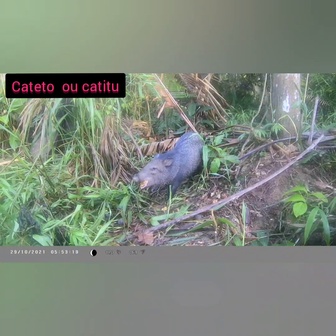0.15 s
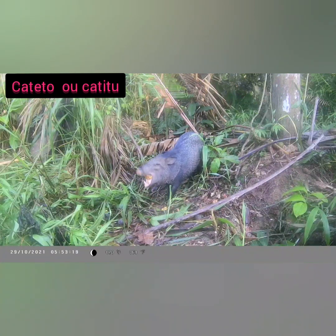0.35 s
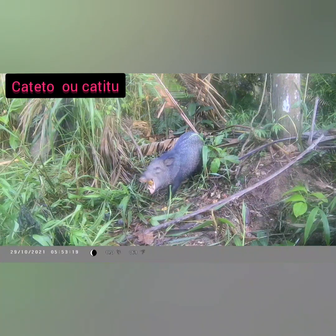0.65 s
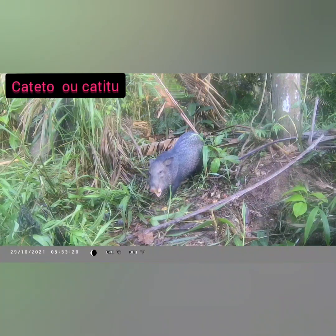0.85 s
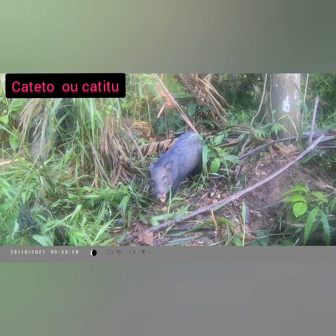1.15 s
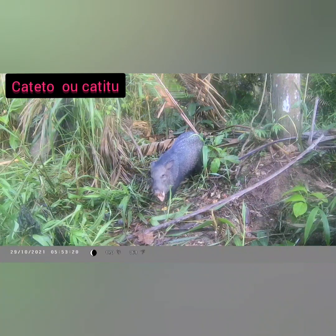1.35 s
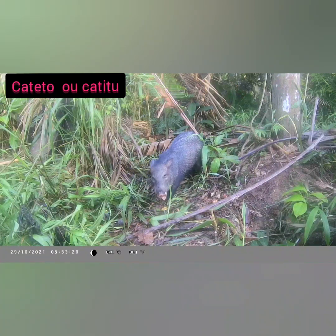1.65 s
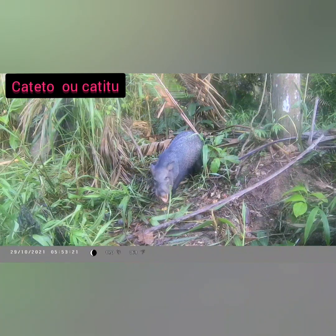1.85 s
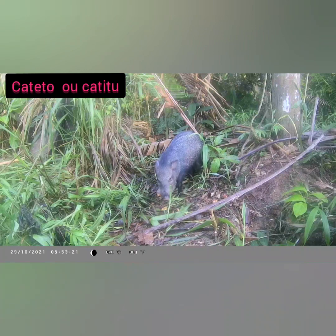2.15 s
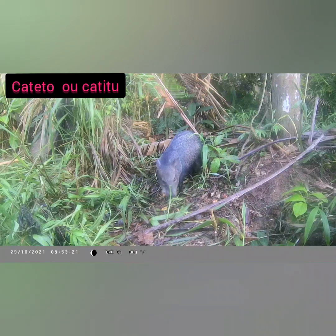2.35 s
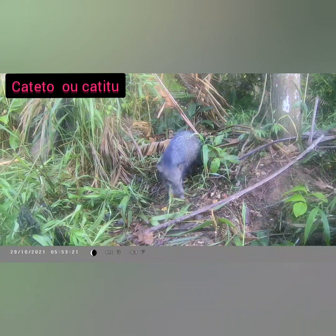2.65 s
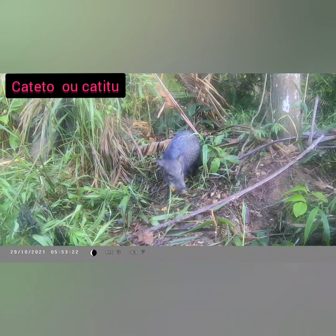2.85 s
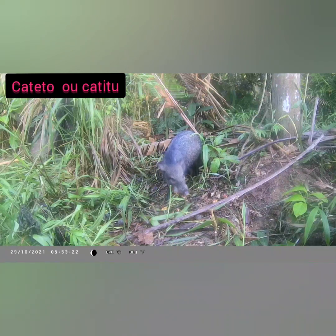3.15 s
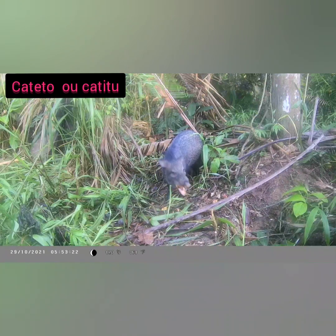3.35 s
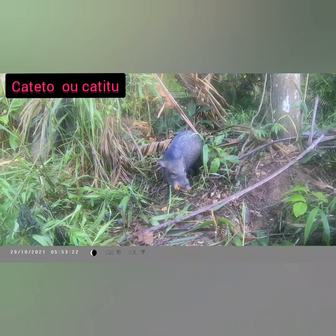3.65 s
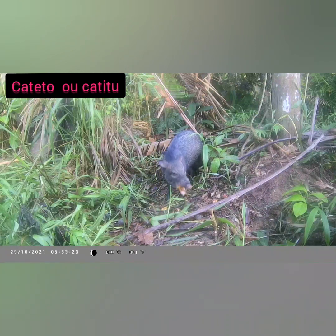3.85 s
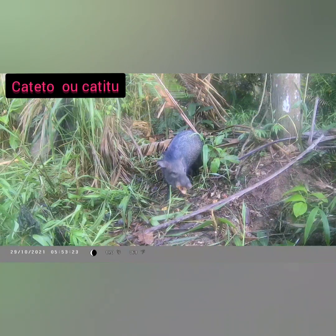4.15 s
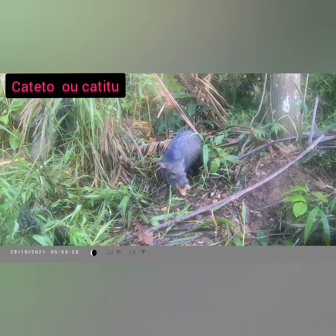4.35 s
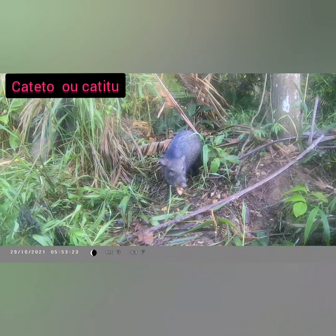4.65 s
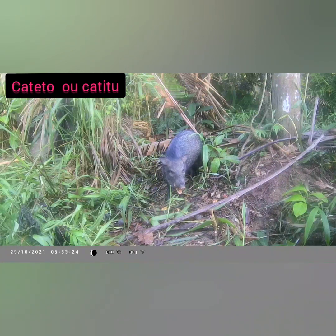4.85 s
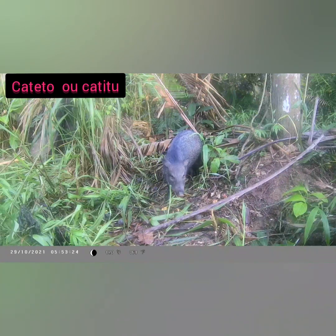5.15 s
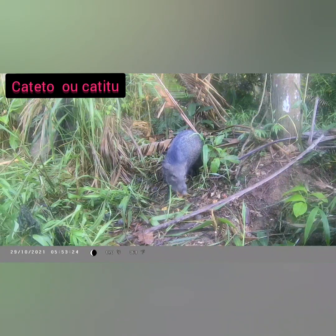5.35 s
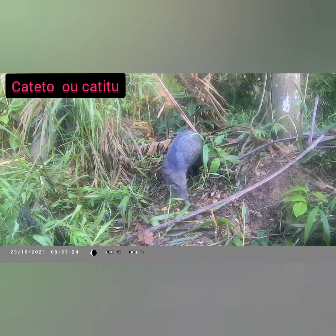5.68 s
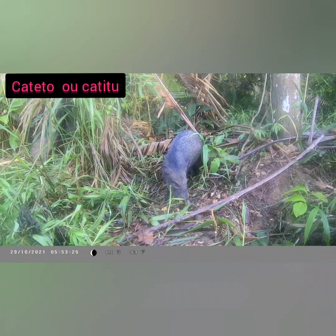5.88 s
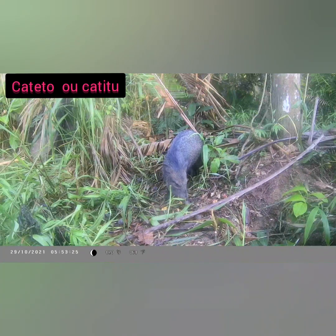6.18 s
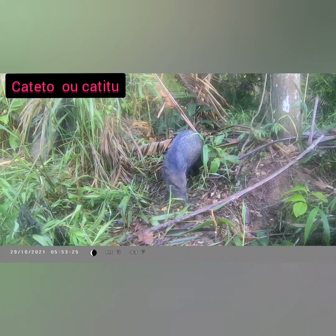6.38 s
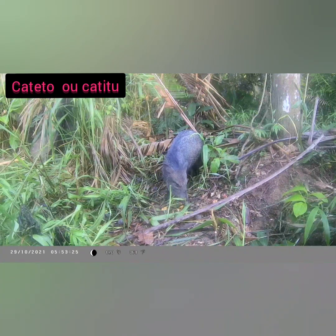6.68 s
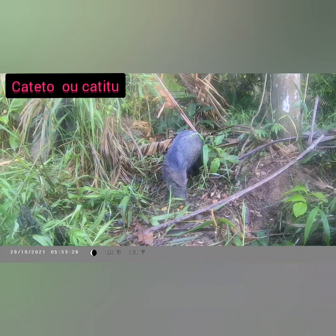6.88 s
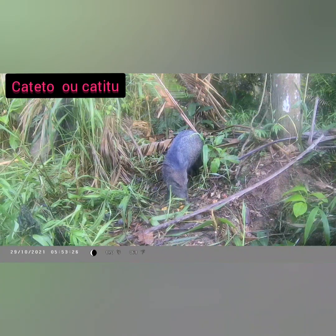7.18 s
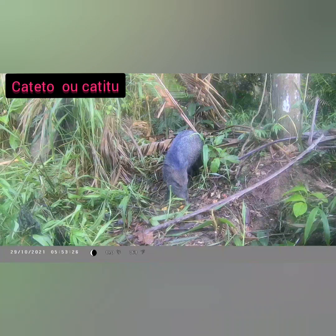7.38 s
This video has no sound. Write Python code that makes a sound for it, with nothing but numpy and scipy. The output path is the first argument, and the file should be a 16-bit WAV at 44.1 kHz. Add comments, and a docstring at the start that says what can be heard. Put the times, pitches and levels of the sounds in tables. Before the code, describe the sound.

A steady chorus of insects, perhaps tiny frogs, chirps throughout in a leafy forest. Rough rising notes come mostly in quick pairs, echoing among trunks, over a shimmering band and soft hiss. Crickets trill in bouts, birds whistle faintly far off, and a peccary makes small irregular cracks and leaf ticks. A fixed outdoor microphone adds low flutter and a faint tone, with dull top end.

```python
"""A chorus of insects (perhaps tiny frogs too) throws rising chirps, mostly in pairs, in a tropical forest.
Each chirp is a pulsed sine that climbs in pitch; noise-like echo tails scatter the calls among the trunks.
Crickets trill in short sine strokes, birds whistle far off, and a peccary cracks food and stirs the litter
with bursts of ringing noise. Shaped noise makes the steady hiss; the trail camera adds a low flutter
and a faint tone of its own from multiples of its frame rate."""
import sys
import numpy as np
from scipy import signal
from scipy.fft import rfft, irfft
from scipy.io import wavfile
from scipy.ndimage import uniform_filter1d

SR = 44100
rng = np.random.default_rng(int(sys.argv[2]) if len(sys.argv) > 2 else 0)


def persist_wave(psi):
    """Save psi, clipped to +-1, as 16-bit WAV."""
    counts = np.round(np.clip(psi, -1, 1) * 32767).astype(np.int16)
    wavfile.write(sys.argv[1], SR, np.atleast_2d(counts).T)


N = 331632  # length in samples, about 7.5 s
TIME = np.arange(N) / SR


def undb(db):
    """Turn decibels into a gain."""
    return 10 ** (np.asarray(db) / 20)


def unit(x):
    """Scale a sound to an average (rms) strength of 1."""
    return x / np.sqrt(np.mean(x ** 2) + 1e-30)


def curve(rows):
    """Join (time in seconds, value) rows by straight lines."""
    return np.interp(TIME, *np.transpose(rows))


def add(out, start, sound):
    """Mix a sound in at a given time, dropping whatever falls outside the scene."""
    i = int(start * SR)
    part = sound[max(-i, 0):max(N - i, 0)]
    first = max(i, 0)
    out[first:first + len(part)] += part


def sine(hz):
    """A tone of rms 1 that follows a pitch curve, from a random point in its cycle."""
    cycles = np.cumsum(hz) / SR + rng.random()
    return np.sqrt(2) * np.sin(2 * np.pi * cycles)


def walk(rate):
    """Smooth random wandering with a spread near 1, taking "rate" new values a second."""
    size = int(SR / rate)
    steps = np.repeat(rng.standard_normal(N // size + 1), size)
    smooth = uniform_filter1d(uniform_filter1d(steps, size), size)
    return unit(smooth)[:N]


def noise(colour):
    """Noise of rms 1 whose spectrum follows (Hz, dB) points."""
    hz, db = np.transpose(colour)
    bins = np.maximum(np.fft.rfftfreq(N, 1 / SR), 1)
    gain = undb(np.interp(np.log(bins), np.log(hz), db))
    return unit(irfft(rfft(rng.standard_normal(N)) * gain, N))


def resonate(x, hz, q):
    """One resonance with gain 1 at its centre; a higher q rings longer and purer."""
    b, a = signal.iirpeak(min(hz, SR / 2 - 1), max(q, 1), fs=SR)
    return signal.lfilter(b, a, x)


def scatter(x, t60, gap=0.0018):
    """Echoes from leaves and trunks: a dense tail of unit energy that fades by 60 dB in t60 seconds."""
    t = np.arange(SR) / SR
    fade = np.exp(-np.log(1000) * t / t60)
    tail = rng.standard_normal(SR) * fade * np.clip(t / gap - 1, 0, 1)  # silent for the first gap seconds
    return signal.fftconvolve(x, tail / np.linalg.norm(tail))[:N]


def chirp(hz, swell, jitter, fade_share=0.53, longest_fade_s=.022, overshoot_hz=200, start_db=-7.5):
    """One rough pulsed note: it starts abruptly, swells while its pitch climbs, then fades."""
    pulse_hz, pulse_depth, attack_s = 88, .62, .002
    rest_hz, climb_s = 3978, .066  # it climbs as if it left the resting pitch this long before its peak
    fade = min(fade_share * swell, longest_fade_s)
    t = np.arange(-swell, 3 * fade, 1 / SR)  # time 0 is the loudest moment
    before, after = np.minimum(t, 0), np.maximum(t, 0)
    pitch = hz + (hz - rest_hz) * before / climb_s + overshoot_hz * np.tanh(after / longest_fade_s)
    attack = np.minimum((t + swell) / attack_s, 1)
    shape = attack * undb(-start_db * before / swell) * np.exp(-(after / fade) ** 1.8)
    # each note pulses at its own slightly different rate
    half_turns = pulse_hz * rng.uniform(.85, 1.15) * t + rng.uniform(-.25, .25)
    pulses = 1 - pulse_depth * np.sin(np.pi * half_turns) ** 4
    return sine(pitch + jitter[:len(t)]) * shape * pulses


def chirps(gain_db=.6, direct_slope=0.29, forest_db=-5, trunk_db=-10, trunk_s=.034):
    """A call is one note, or that note and a shorter repeat; weaker callers are further off and wetter."""
    # Rising chirps, single or in pairs. Each row: loudest moment of the first note in seconds,
    # level in dB before the shared gain, pitch when loudest in Hz, number of notes.
    calls = [(-.064, -39, 4853, 2), (0.104, -55.5, 4280, 1), (.222, -39.5, 4836, 1), (.715, -49, 4400, 1),
             (0.741, -38.5, 4775, 2), (1.013, -45.5, 4790, 1), (1.165, -42, 4790, 2), (1.205, -40, 4805, 2),
             (1.512, -48.5, 4790, 1), (1.58, -51, 4390, 1), (1.72, -36, 4845, 2), (2.08, -56.5, 4300, 1),
             (2.142, -47.5, 4780, 1), (2.355, -38, 4852, 2), (2.695, -46, 4810, 1), (2.866, -40.5, 4856, 2),
             (3.175, -38, 4845, 2), (3.426, -46.5, 4640, 1), (3.524, -47, 4840, 1), (3.72, -40, 4730, 2),
             (4.123, -40, 4814, 2), (4.352, -38.5, 4710, 2), (4.765, -46.5, 4720, 1),
             (4.917, -41.5, 4830, 2), (4.94, -48, 4400, 1), (4.984, -40, 4700, 1), (5.365, -53.5, 4350, 1),
             (5.433, -38, 4833, 2), (5.692, -41.5, 4860, 2), (5.849, -53.5, 4390, 1), (5.932, -38, 4877, 2),
             (6.29, -46.5, 4570, 1), (6.531, -41, 4834, 2), (6.713, -38.5, 4814, 2),
             (7.051, -48.5, 4570, 1), (7.114, -40, 4853, 2), (7.447, -38.5, 4866, 1)]
    near_db = -39  # chirps this loud arrive directly
    swell_s, smear_s_per_db = 0.035, .0017  # weaker, farther chirps swell more slowly
    pair_gap_s, second_swell_s, second_note_db = .105, .019, 0.54
    jitter_hz = 50
    near, far, jitter = np.zeros(N), np.zeros(N), jitter_hz * walk(500)
    for first_peak, db, hz, notes in calls:
        weaker_db = max(near_db - db, 0)
        direct = undb(-direct_slope * weaker_db)
        scattered = np.sqrt(max(1 - direct ** 2, 0))
        first = (first_peak, swell_s + smear_s_per_db * weaker_db, db)
        second = (first_peak + pair_gap_s, second_swell_s, db + second_note_db)
        for peak, swell, note_db in [first, second][:round(notes)]:
            note = chirp(hz, swell, np.roll(jitter, -int(peak * SR))) * undb(note_db + gain_db)
            add(near, peak - swell, note * direct)
            add(far, peak - swell - .008, note * scattered)
    leaves = undb(-7) * scatter(near, t60=.06) + scatter(far, t60=.07)
    trunk = np.zeros(N)
    add(trunk, trunk_s, undb(trunk_db) * scatter(near, t60=.04))  # one stronger echo from a big tree
    return near + leaves + trunk + undb(forest_db) * scatter(near + far, t60=0.62)


def slurs(length=.065, first_hz=4130, fall_hz=190, overtone_db=-26):
    """A lower caller repeats a note that sags at its end, with a faint octave above it."""
    # Runs of soft falling notes. Each row: start in seconds, level in dB, number of notes.
    runs = [(.729, -59, 4), (2.239, -59, 5), (3.839, -58.5, 4), (4.9, -60, 4), (6.333, -59.5, 4)]
    period = .088  # seconds from note to note
    out, u = np.zeros(N), np.linspace(0, 1, int(length * SR))
    for start, db, notes in runs:
        for k in range(round(notes)):
            hz = first_hz + 15 * rng.standard_normal() - fall_hz * u ** 2
            tone = sine(hz) + undb(overtone_db) * sine(2 * hz)
            add(out, start + k * period, undb(db) * np.sin(np.pi * u) * tone)
    return out + undb(-9) * scatter(out, t60=.3)


def near_cricket(length=.026, sag_hz=90):
    """Each closing of the wings rings one short tone that sags as the stroke slows."""
    # Phrases of strokes. Each row: middle of the first stroke in seconds, number of strokes,
    # first pitch in Hz, last pitch in Hz, first level in dB, last level in dB.
    phrases = [(2.417, 9, 5755, 5900, -51.5, -52.5), (5.234, 1, 5180, 5290, -50.5, -52),
               (5.36, 6, 5190, 5490, -52, -46.5)]
    period = .0448  # seconds from stroke to stroke
    out, u = np.zeros(N), np.linspace(0, 1, int(length * SR))
    for start, count, first_hz, last_hz, first_db, last_db in phrases:
        strokes = np.linspace((first_hz, first_db), (last_hz, last_db), round(count))
        for k, (hz, db) in enumerate(strokes):
            tone = sine(hz - sag_hz * (u - .5))
            add(out, start + k * period - length / 2, undb(db) * np.sin(np.pi * u) * tone)
    return out + undb(-14.0) * scatter(out, t60=0.5)


def far_cricket(pitch_hz=5750, sag_hz=140, wander_hz=45, rasp_db=-4):
    """Bouts of a fast raspy trill whose strokes differ a little in pitch, blurred by the undergrowth."""
    # Bouts of trilling. Each row: start in seconds, end in seconds.
    bout_times = [(.42, 0.88), (1.54, 2.24), (3.72, 4.45), (4.85, 6.72), (7.1, 8.3)]
    trill_db, fade_s = -69.5, .06  # shared gain in dB; time of each fade in or out
    stroke_hz = 33.5
    stroke = np.cumsum(stroke_hz * (1 + 0.017 * walk(4.2))) / SR % 1  # runs from 0 to 1 in each stroke
    pitch = pitch_hz + wander_hz * walk(50) - sag_hz * (stroke - .5)
    song = unit(sine(pitch) * np.sin(np.pi * stroke) ** 2)
    rasp = unit(resonate(resonate(rng.standard_normal(N), 5900, 15), 5900, 15))
    bouts = np.zeros(N)
    for start, end in bout_times:
        bouts += np.clip(.5 + np.minimum(TIME - start, end - TIME) / fade_s, 0, 1)
    mix = undb(2.5) * song + undb(-9) * scatter(song, t60=0.58) + undb(rasp_db) * rasp
    return mix * bouts * undb(trill_db)


def chorus(db=-53.0, spread_db=4, length=0.07, first_hz=4150, last_hz=5100, count=170):
    """Scores of far callers whose rising chirps melt into one shimmering band."""
    # Rise and fall of the chorus; only the shape counts. Each row: time in seconds, level in dB.
    loudness = [(0.0, -50.5), (0.71, -55.5), (0.88, -50), (5.34, -52), (5.55, -50), (7.52, -52)]
    # Colour of its noise part, relative only. Each row: frequency in Hz, level in dB.
    colour = [(3600, -52.5), (3950, -13), (4200, -2.5), (4500, 2), (4850, 4), (5080, 4.5), (5350, -24.5),
              (5900, -37)]
    calls, u = np.zeros(N), np.linspace(0, 1, int(length * SR))
    places = (np.arange(count) + rng.random(count)) / count  # spread over the whole scene
    for place, (size, detune) in zip(places, rng.uniform(-0.967, 1, (count, 2))):
        hz = (first_hz + (last_hz - first_hz) * u) * (1 + 0.0363 * detune)
        call = undb(spread_db * size) * np.sin(np.pi * u) * sine(hz)
        add(calls, place * N / SR - length / 2, call)
    blend = undb(-4) * unit(calls + .6 * scatter(calls, t60=.4)) + undb(-3) * noise(colour)
    return undb(db) * blend * unit(undb(curve(loudness)))


def low_drone(db=-79, hz=3220, q=12):
    """Very distant insects hold a thin band below the chorus."""
    band = unit(resonate(resonate(rng.standard_normal(N), hz, q), hz, q))
    return undb(db + 2 * walk(7)) * band


def birds(clear_db=-12, foliage_db=-4, haze_db=-1.0, rise_swell_db=7):
    """Whistles from deep among the trees; many paths through the foliage blur them into a haze."""
    # Whistles that slur upwards, then downwards. Each row: start in seconds, length in seconds,
    # middle pitch in Hz, level in dB before the mix of clear and blurred sound.
    rising = [(.345, 0.18, 3030, -61.5), (0.823, 0.16, 3130, -59.5), (1.308, .16, 2940, -60),
              (2.706, 0.051, 2570, -68), (2.989, 0.07, 2674, -70.5), (4.976, 0.092, 2950, -67),
              (5.208, 0.098, 2870, -63), (6.859, 0.057, 2455, -67)]
    falling = [(.28, 0.052, 3320, -65), (0.742, .04, 3270, -65.5), (2.203, .05, 3470, -63),
               (0.931, .16, 2880, -67.5), (1.367, 0.16, 2390, -64), (2.811, .2, 2763, -65),
               (3.039, .12, 2894, -64), (3.959, 0.18, 1802, -70), (4.635, 0.21, 1900, -67.5),
               (5.045, 0.077, 3680, -58), (5.037, .22, 2025, -67.5), (5.323, .083, 2590, -68),
               (6.551, 0.075, 2790, -68), (6.917, 0.17, 2443, -66.5)]
    # Long level whistles. Each row: start in seconds, length in seconds, level in dB before that mix.
    held = [(3.585, 0.17, -69.5), (4.38, 0.18, -69), (5.01, 0.14, -68), (5.53, 0.38, -71),
            (6.088, 0.36, -71)]
    rise_oct_per_s, fall_oct_per_s, held_hz = 1.9, 2.2, 2282  # slur speeds are those at mid-note
    glide_ease = .45  # share by which a slur slows towards its end
    waver, blur = .016, .03  # pitch wobble as a share of the pitch
    clear, hazy = np.zeros(N), np.zeros(N)
    voices = ((clear, 1 + waver * walk(70)), (hazy, 1 + blur * walk(300)))
    notes = [(*row, rise_oct_per_s) for row in rising]
    notes += [(*row, -fall_oct_per_s) for row in falling]
    notes += [(start, length, held_hz, db, 0) for start, length, db in held]
    for start, length, middle_hz, db, glide in notes:
        u = np.linspace(-.5, .5, int(length * SR))
        hz = middle_hz * 2 ** (glide * length * (u - glide_ease * u ** 2))
        level = undb(db + rise_swell_db * u * (glide > 0))  # rising notes grow louder
        shape = level * np.sqrt(np.abs(np.cos(np.pi * u)))
        for out, wobble in voices:
            note_wobble = np.roll(wobble, -int(start * SR))[:len(u)]
            add(out, start, shape * sine(hz * note_wobble))
    foliage = undb(foliage_db) * scatter(clear, t60=0.091)
    return undb(clear_db) * clear + foliage + undb(haze_db) * scatter(hazy, t60=.9)


def peccary(body_q=0.34, snap_hz=4500, attack_s=0.00068, crack_db=1):
    """Food and twigs break with a snap and a body that rings purer the longer it lasts; leaves brush past."""
    # Cracks of food and twigs. Each row: start in seconds, level in dB before the shared crack gain,
    # ringing pitch in Hz, decay time in seconds.
    cracks = [(.205, -42, 1060, 0.0019), (0.391, -53, 780, 0.0067), (1.258, -57, 2380, 0.0048),
              (1.726, -60, 1370, 0.0083), (1.93, -58.5, 2020, 0.01), (2.011, -55, 805, 0.0079),
              (2.354, -59.5, 1510, 0.004), (2.368, -62, 815, 0.017), (3.035, -47.5, 1750, 0.0015),
              (3.107, -51, 6840, .004), (3.137, -52.5, 696, 0.0041), (3.456, -57.5, 840, .0077),
              (3.512, -57.5, 822, 0.033), (4.55, -55, 2140, 0.0027), (5.041, -46.5, 1150, 0.0037),
              (5.087, -59.5, 594, 0.015), (5.378, -65.5, 430, 0.064), (5.483, -56.5, 1460, 0.004),
              (5.646, -54.5, 232, 0.015), (5.908, -60, 1100, 0.005), (6.656, -57, 2600, .005),
              (6.81, -61.5, 1090, 0.011), (7.346, -56, 2200, 0.0046)]
    # Leaves brushed aside. Each row: start in seconds, length in seconds, level in dB, centre in Hz.
    brushes = [(2.165, 0.053, -57.5, 6330), (2.93, 0.072, -57.5, 6360)]
    base_snap_db, snap_db_per_oct = -8.5, 2  # snap against a 1 kHz body; lower cracks are duller
    out, t = np.zeros(N), np.arange(SR // 5) / SR
    for start, db, hz, decay in cracks:
        body, snap = rng.standard_normal((2, len(t)))
        snap_db = base_snap_db + snap_db_per_oct * np.log2(hz / 1000)
        ring = unit(resonate(body, hz, body_q * decay * hz))
        burst = ring + undb(snap_db) * unit(resonate(snap, snap_hz, 1))
        shape = np.minimum(t / attack_s, 1) * np.exp(-t / decay)
        add(out, start, undb(db + crack_db) * burst * shape)
    for start, length, db, hz in brushes:
        rub = unit(resonate(rng.standard_normal(len(t)), hz, 22))
        add(out, start, undb(db) * rub * np.sin(np.pi * np.minimum(t / length, 1)))
    return out + undb(-12.5) * scatter(out, t60=0.13)


def litter(per_second=14, db=-68, spread_db=4, decay=0.0052):
    """Tiny ticks of dry leaves settling under the hooves: random clicks that fade within milliseconds."""
    sizes = undb(spread_db * np.minimum(rng.exponential(size=N), 3))
    ticks = (rng.random(N) < per_second / SR) * sizes
    envelope = signal.lfilter([1], [1, -np.exp(-1 / (decay * SR))], ticks)
    return undb(db) * envelope * noise([(300, -17), (1000, 4.5), (3500, 6.5), (7000, 4), (9000, -17.5)])


def air(db=-57, leaves_db=-71, patchy_db=2.5, flicker_db=3.0):
    """Low rumble and a high hiss of countless insects, with flickering patches of soft leaf rustle."""
    # Colour of the forest air and insect hiss, relative only. Each row: frequency in Hz, level in dB.
    colour = [(20, 0.5), (60, -4), (120, -10.5), (250, -16.5), (500, -22.5), (800, -24), (1400, -28.5),
              (2600, -27), (3200, -29.5), (3700, -29.5), (5300, -16), (6100, -21), (7200, -27),
              (8000, -43.5), (8800, -46.5)]
    # Rise and fall of the treble rustle; only the shape counts. Each row: time in seconds, level in dB.
    rustle_level = [(0.0, -72), (0.5, -69), (0.96, -69), (1.4, -72.5), (2.07, -64.5), (3.81, -71.5),
                    (6.95, -72), (7.52, -71.5)]
    flicker = undb(leaves_db + patchy_db * walk(14) + flicker_db * walk(110))
    patches = unit(undb(curve(rustle_level))) * flicker
    hiss = undb(db + 0.91 * walk(14)) * noise(colour)
    return hiss + patches * unit(resonate(noise(colour), 7760, 11))


def camera(unsteady=.3):
    """The electronics flutter at the frame rate; multiples near 700 Hz make a faint, finely pulsing tone."""
    # Flutter once per frame. Each row: multiple of the frame rate, level in dB.
    flutter = [(1, -54), (2, -66.5), (3, -80.5), (4, -83.5), (5, -82.5), (27, -101.5), (28, -83.5),
               (29, -74.5), (30, -88), (31, -95)]
    frame_hz = 24.31
    turn = 2 * np.pi * frame_hz * TIME
    sway = 1 + unsteady * walk(8.4)
    out = np.zeros(N)
    for multiple, db in flutter:
        tone = np.sqrt(2) * undb(db) * np.cos(round(multiple) * turn)
        out += tone * (sway if multiple < 10 else 1)  # only the low throb is unsteady
    return out


def scene():
    """Everything at one microphone."""
    insects = chirps() + slurs() + near_cricket() + far_cricket() + chorus() + low_drone()
    return (insects + birds() + peccary() + litter() + air() + camera())[None]


def record(dry):
    """The camera cuts the top; its converter sits slightly off zero."""
    top_hz, offset = 8500, .0056  # offset as a share of full scale
    steep_cut = signal.ellip(8, .2, 70, top_hz, fs=SR, output="sos")
    return signal.sosfilt(steep_cut, dry) + offset


dry = scene()
out = record(dry)
persist_wave(out)
```